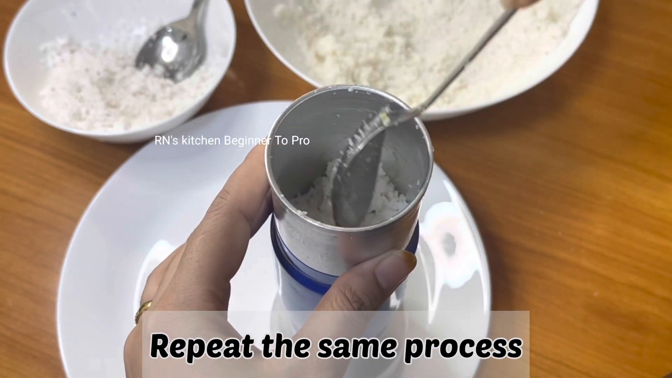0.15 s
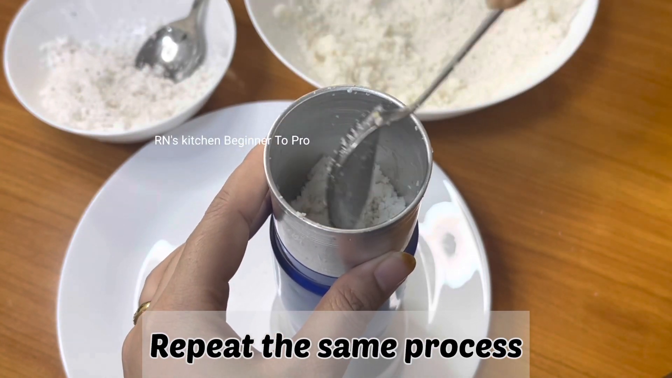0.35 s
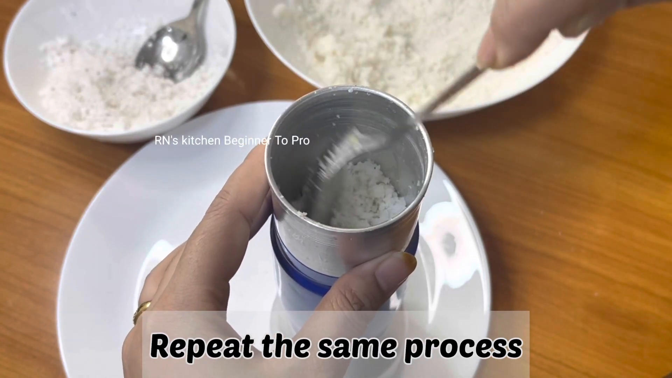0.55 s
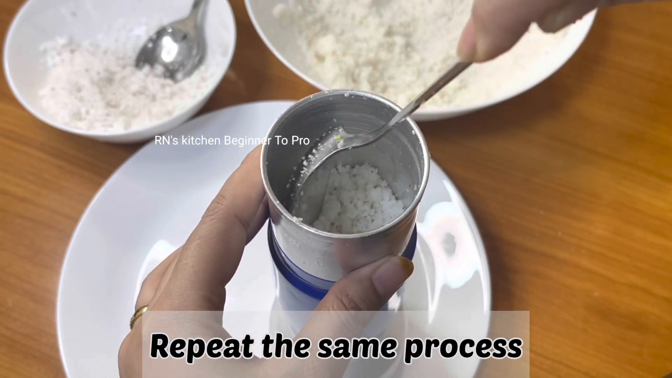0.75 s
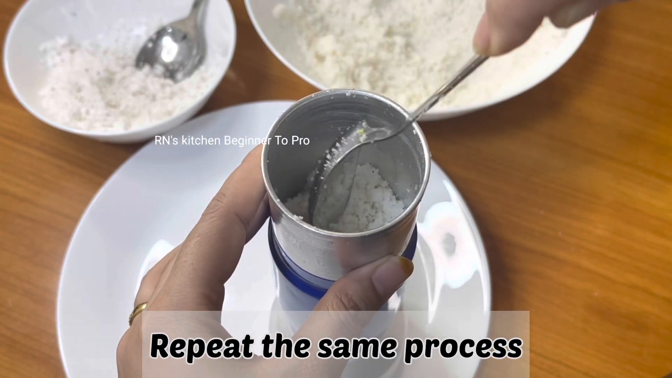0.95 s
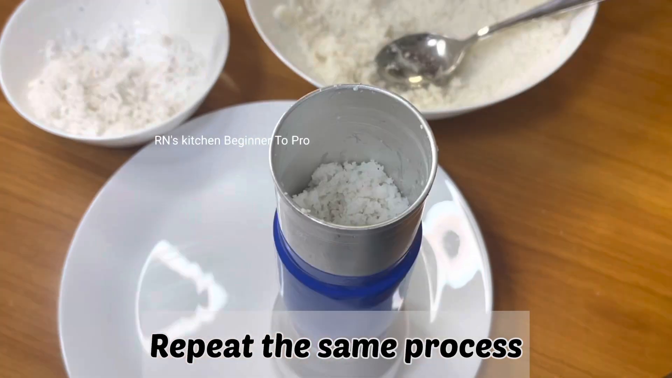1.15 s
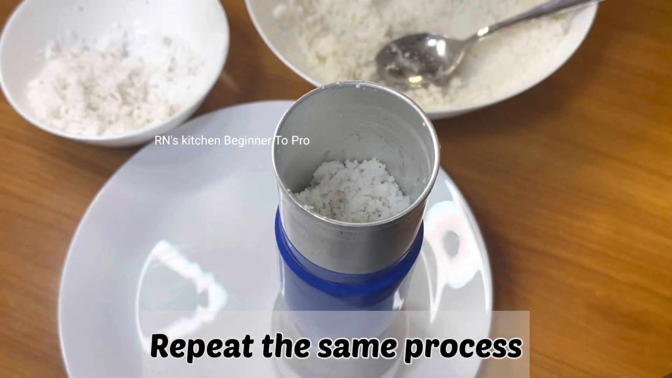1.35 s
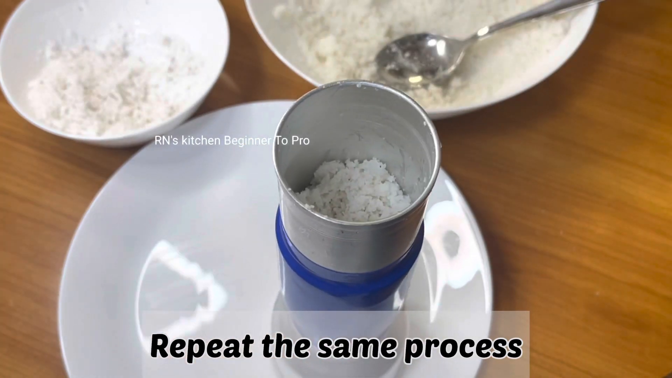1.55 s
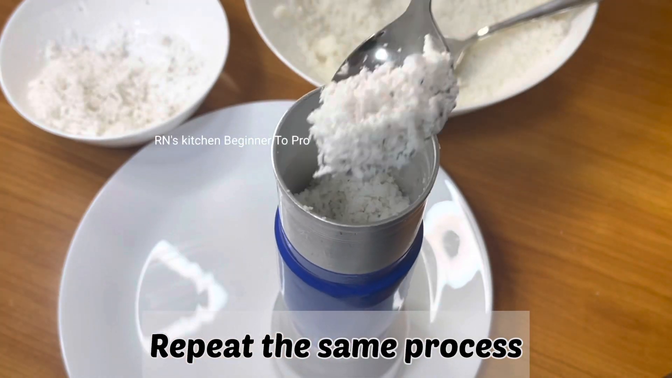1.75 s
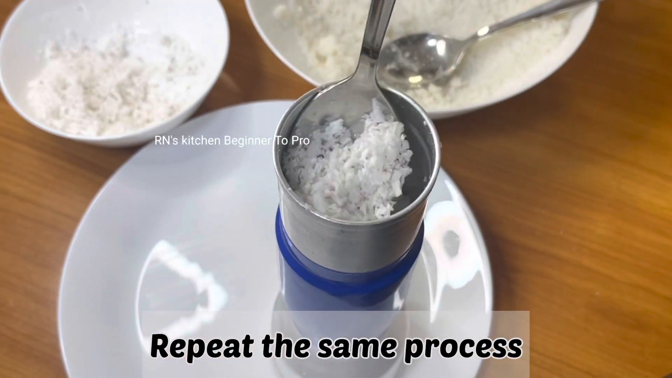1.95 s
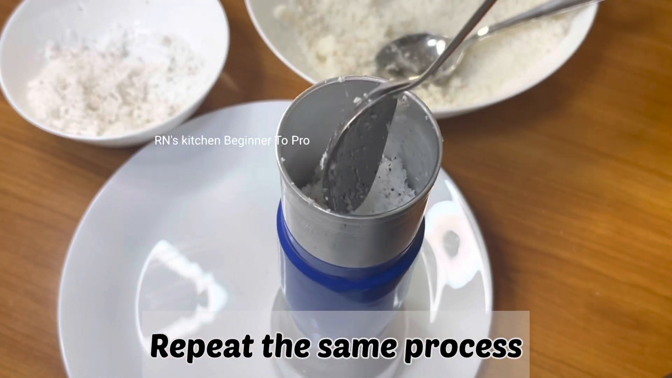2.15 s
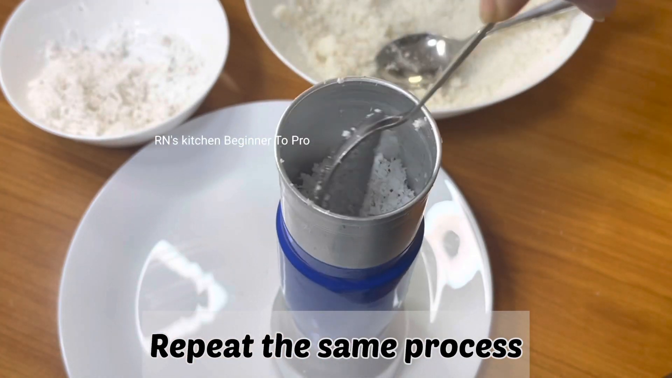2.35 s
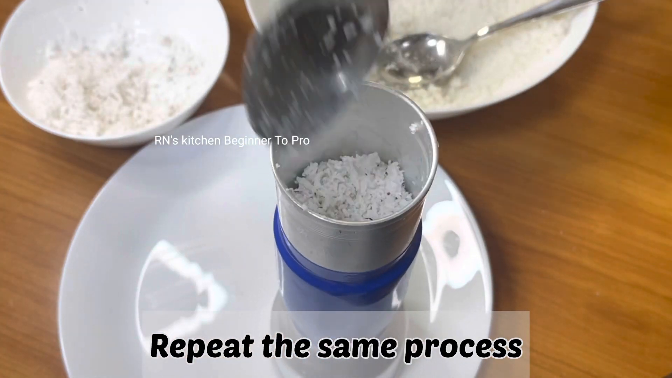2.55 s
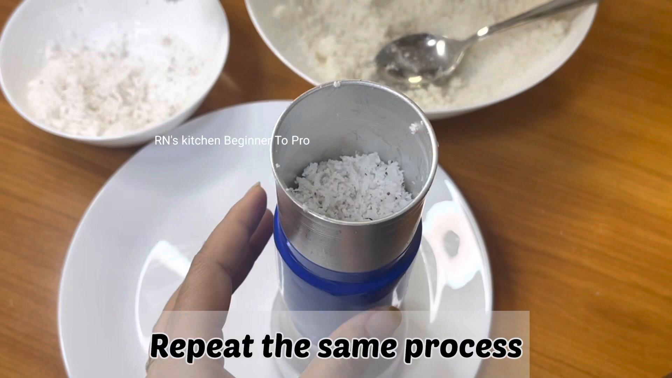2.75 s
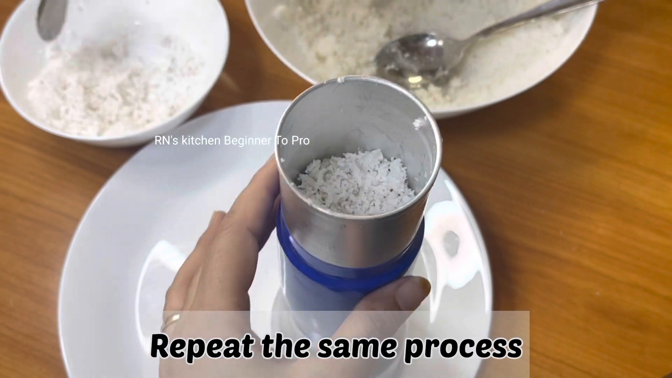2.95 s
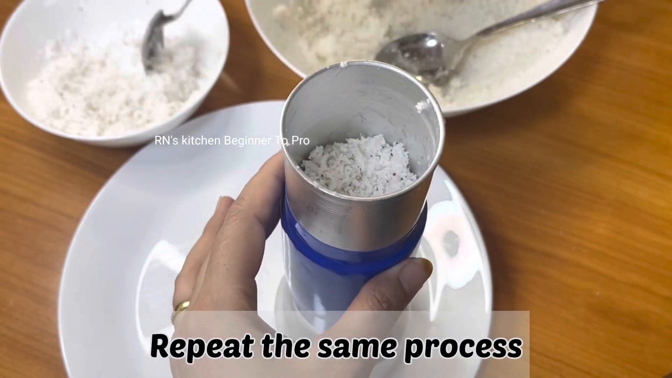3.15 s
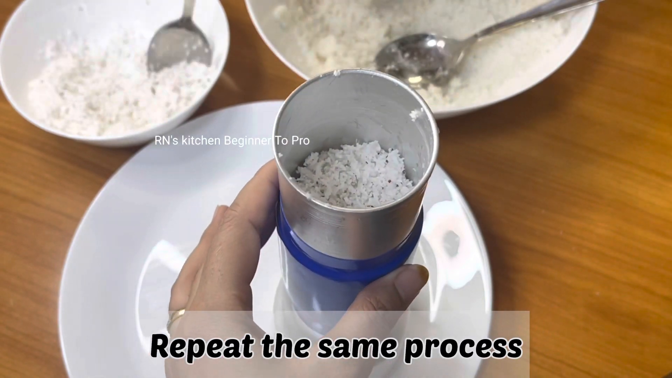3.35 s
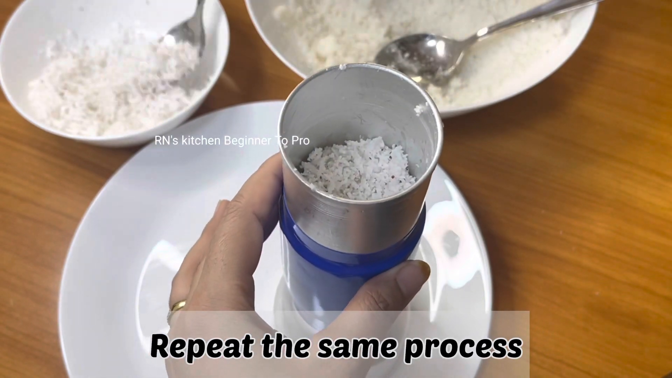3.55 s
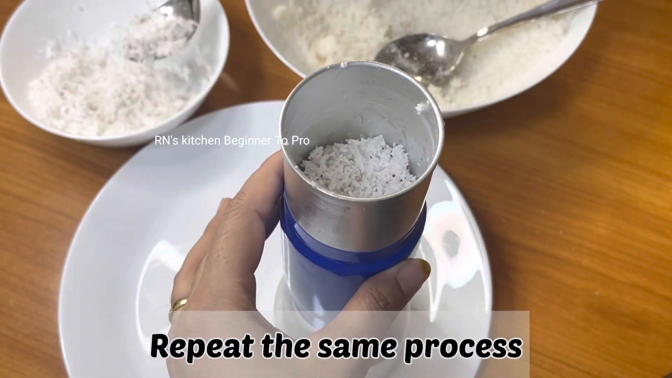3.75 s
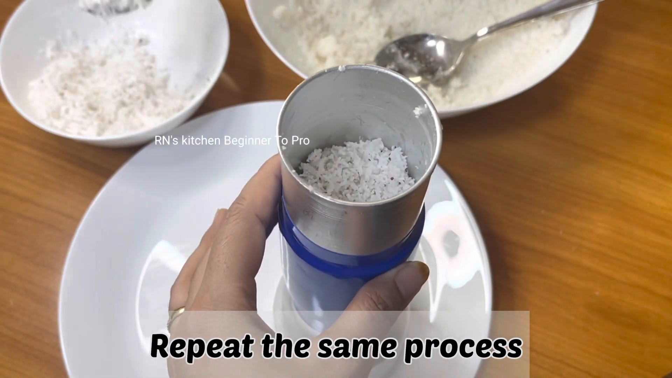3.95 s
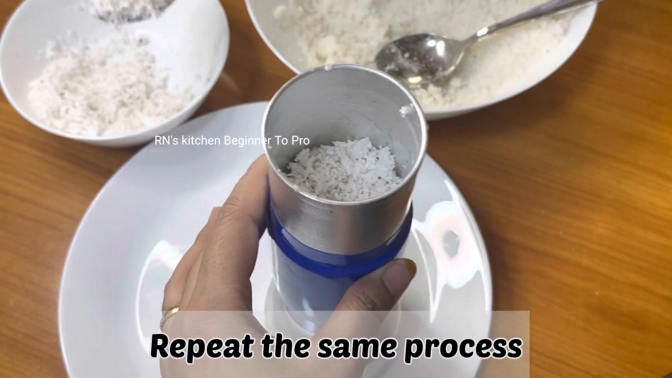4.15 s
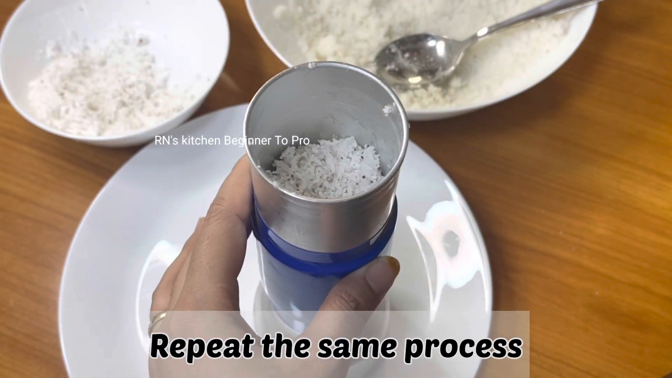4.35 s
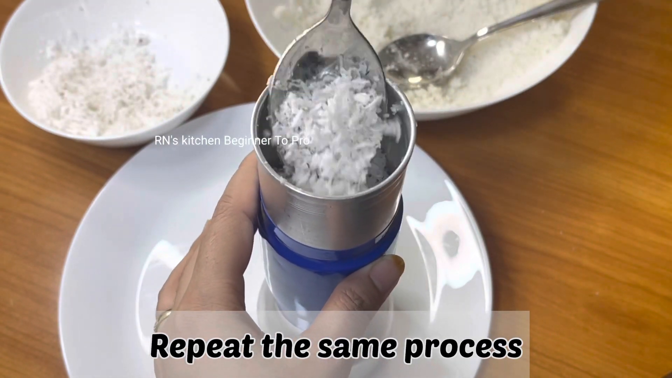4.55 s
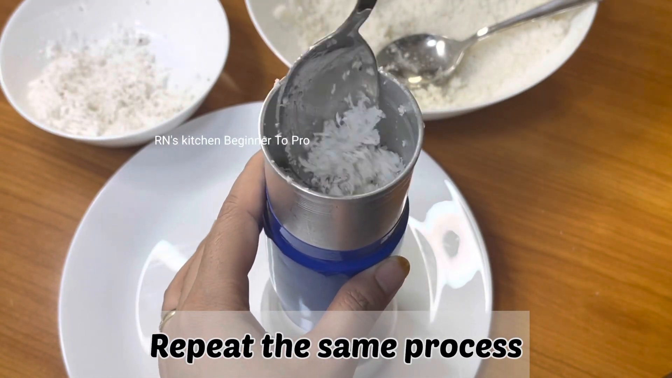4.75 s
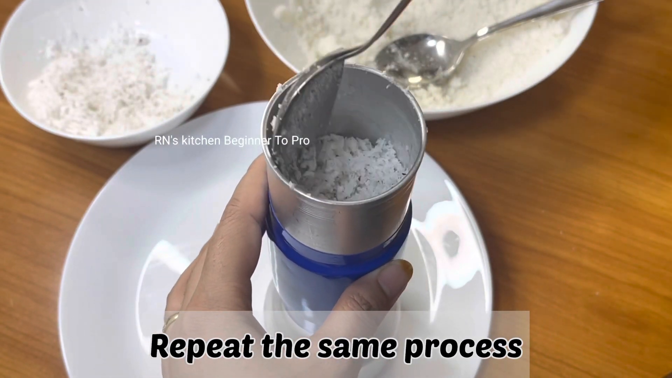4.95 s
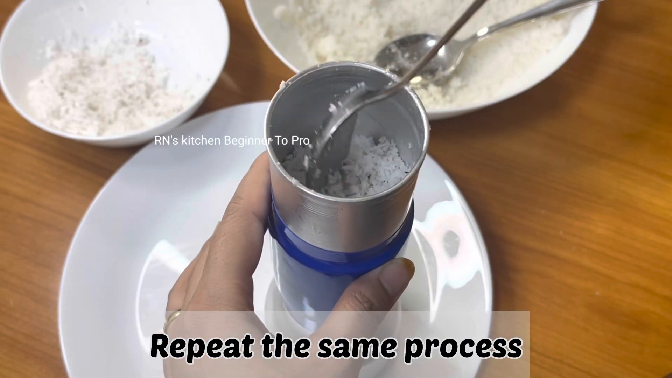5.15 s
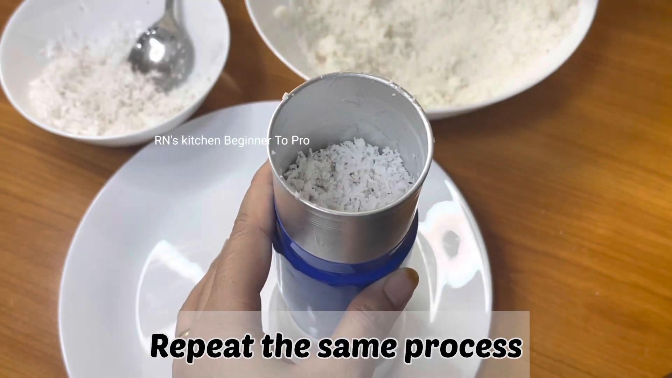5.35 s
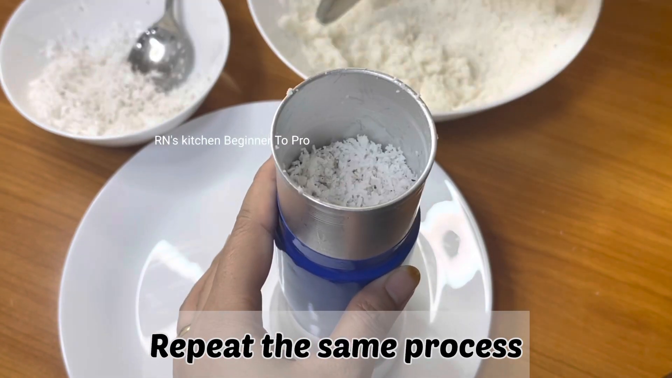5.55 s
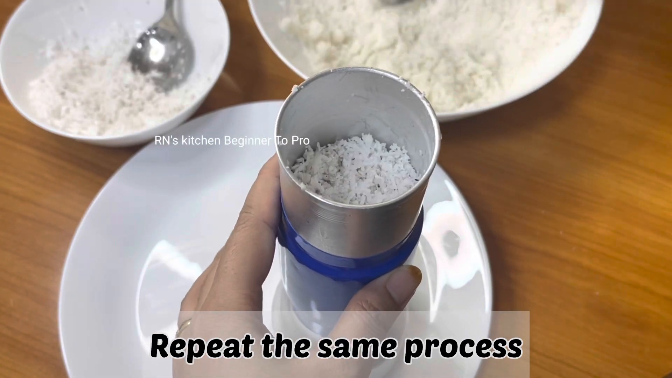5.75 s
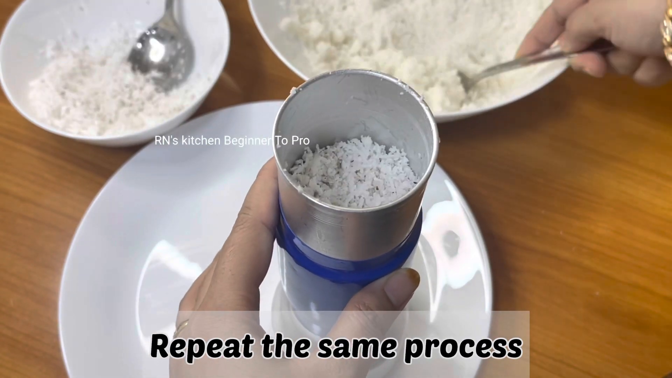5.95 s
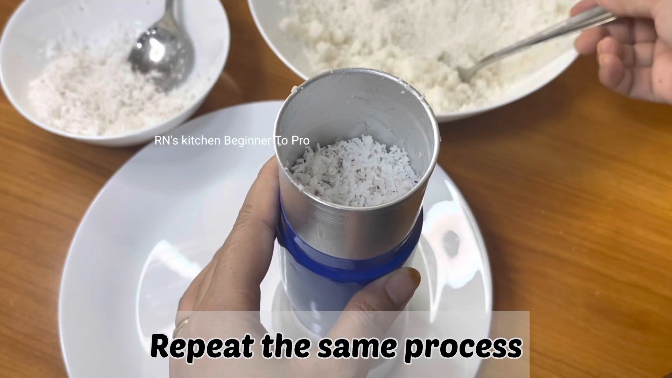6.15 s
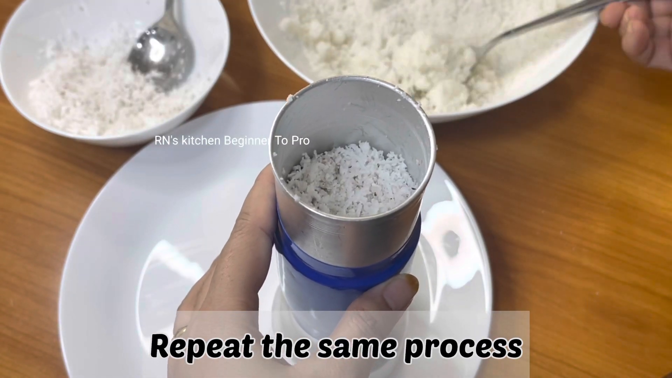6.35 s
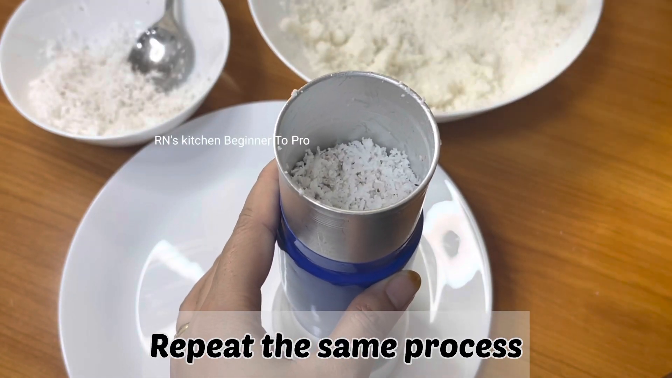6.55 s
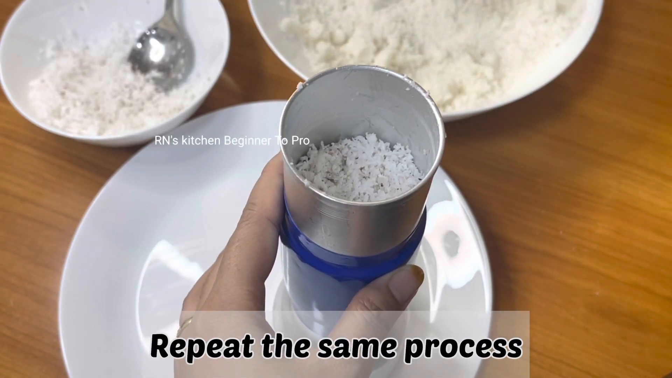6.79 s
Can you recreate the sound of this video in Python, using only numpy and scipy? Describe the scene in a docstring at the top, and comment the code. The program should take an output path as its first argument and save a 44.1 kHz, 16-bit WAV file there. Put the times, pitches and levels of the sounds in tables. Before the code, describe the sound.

Close, dry metallic clacks of a spoon packing grated food into a steel tube, broken by quiet gaps, one bright ceramic clink and low room hum.

```python
"""A small kitchen: a steel spoon fills a hand-held metal tube with grated food, over a low room hum. Taps,
clinks and knocks are noisy contacts that set off the ringing modes of tube, bowls or spoon. Scrapes along the
tube, rustles through the food and a faint singing are trains of small random slips. Table bumps are short low
sines. Hum and hiss are shaped noise. Diffuse echoes follow each hit and stroke. The whole level dips briefly
twice."""
import sys
import numpy as np
from scipy import signal
from scipy.fft import rfft, irfft
from scipy.io import wavfile
from scipy.ndimage import uniform_filter1d

SR = 44100
rng = np.random.default_rng(int(sys.argv[2]) if len(sys.argv) > 2 else 0)


def store_pcm(level_fs):
    """Save levels as 16-bit WAV."""
    pcm = np.round(np.clip(level_fs, -1, 1) * 32767).astype(np.int16)
    wavfile.write(sys.argv[1], SR, np.atleast_2d(pcm).T)


N = 300752


def gain_of(db):
    """dB to amplitude."""
    return 10 ** (np.asarray(db) / 20)


def evened(x):
    """Scales to rms 1."""
    return x / np.sqrt(np.mean(x ** 2) + 1e-20)


def read(points, hz):
    """Interpolates a spectrum on a log frequency axis."""
    f, value = np.transpose(points)
    return np.interp(np.log(hz + 1), np.log(f + 1), value)


def curve(points):
    """Interpolates (time, level) points over the whole scene."""
    return np.interp(np.arange(N) / SR, *np.transpose(points))


def coloured(x, *spectra):
    """Filters by the sum of the given dB spectra."""
    hz = np.fft.rfftfreq(len(x), 1 / SR)
    return irfft(rfft(x) * gain_of(sum(read(s, hz) for s in spectra)), len(x))


def add(mix, start_s, sound):
    """Mixes a sound in at its start time."""
    part = mix[..., max(round(start_s * SR), 0):][..., :sound.shape[-1]]
    part += sound[..., :part.shape[-1]]


def pair(shape, same):
    """Random short-time spectra for two channels that are partly alike."""
    a, b, c, d = rng.standard_normal((shape[1], shape[0], 4)).T
    lean = np.arccos(np.clip(same, 0, 1)[:, None]) / 2
    shared = np.cos(lean) * (a + 1j * b)
    apart = np.sin(lean) * (c + 1j * d)
    return np.array([shared + apart, shared - apart])


# steep treble limit of room tone, rings, strokes and echoes: (frequency [Hz], level [dB])
TREBLE_LIMIT = [(15800, 0), (16000, -42)]
# room rumble and hiss spectra: (frequency [Hz], level [dB per Hz])
RUMBLE_SPECTRUM = [(15, -72.5), (25, -50.5), (96, -5), (140, -5), (161, -18), (197, -3), (312, -11.5),
                   (374, -12), (456, -16.5), (525, -10.5), (629, -20.5), (1020, -24), (3000, -51.5),
                   (3900, -71), (6600, -120)]
HISS_SPECTRUM = [(1200, -30.5), (2000, -3), (3200, -5.5), (5500, -5.5), (7500, -11), (10200, -12.5),
                 (13600, -4.5), (15200, 2), (15800, 1.5)]
# their levels: (time [s], level [dB])
RUMBLE_LEVEL = [(0, -56.5), (.2, -67), (1., -63.5), (1.4, -67.5), (2.1, -62), (2.3, -66), (4., -67),
                (4.75, -60.5), (5., -66), (5.799, -62), (6.82, -68)]
HISS_LEVEL = [(0, -86), (1.202, -83), (2.601, -83), (4.4, -84.5), (5.4, -82.5), (6.82, -83.5)]
# wavering low tones: (frequency [Hz], width [Hz], level [dB rms])
LOW_TONES = [(97.6, 5.3, -81), (182, 57, -79.5)]
# unevenness of the room tone: (frequency [Hz], spread [dB])
HUM_UNEVENNESS = [(100, 2.5), (800, 2), (2000, 1.2), (16000, 1.2)]
# stereo likeness of the room tone: (frequency [Hz], left-right likeness [0-1])
HUM_LIKENESS = [(60, 1), (150, 0.88), (380, 0.9), (950, 0.71), (2380, 0.15), (5980, 1), (15000, 0.92)]


def hum():
    """Room tone: noise shaped into a rising and falling rumble, two wavering tones and a faint hiss."""
    hz = np.fft.rfftfreq(2048, 1 / SR)
    frames = N // 512 + 5
    patches = rng.standard_normal((frames, len(hz)))
    patches = uniform_filter1d(patches, size=5, axis=0)
    patches = evened(uniform_filter1d(patches, size=20, axis=1)).T
    noise = pair((len(hz), frames), read(HUM_LIKENESS, hz))
    noise = noise * gain_of(read(HUM_UNEVENNESS, hz)[:, None] * patches)

    def layer(shape, level_db):
        """Shapes the shared noise and sets its level."""
        sound = signal.istft(noise * shape[:, None], nperseg=2048, noverlap=1536)[1][:, :N]
        return gain_of(level_db) * evened(sound)

    limit_db = read(TREBLE_LIMIT, hz)
    out = layer(gain_of(read(RUMBLE_SPECTRUM, hz) + limit_db), curve(RUMBLE_LEVEL))
    out = out + layer(gain_of(read(HISS_SPECTRUM, hz) + limit_db), curve(HISS_LEVEL))
    for tone_hz, width_hz, level_db in LOW_TONES:
        out = out + layer(1 / (1 + (2 * (hz - tone_hz) / width_hz) ** 2), level_db)
    return out


def ringing(modes, spread_db, length, split):
    """Free ringing: the struck spot sets each mode's share; a grip splits modes into close clusters."""
    hz, db, t60_s = np.repeat(modes, 4, axis=0).T[:, :, None]
    t = np.arange(length) / SR
    level_luck, pitch_luck = rng.standard_normal((2, len(hz), 1))
    decay = gain_of(db + spread_db * level_luck - 60 * t / t60_s)
    ring = (decay * np.sin(2 * np.pi * hz * (1 + split * pitch_luck) * t)).sum(0)
    return ring / abs(ring).max()


def stroke(row, spectrum, modes, slips_per_s, spread_db):
    """Many small slips of uneven size; part of each goes into the modes of what is rubbed."""
    start_s, rise_s, fall_s, peak_db, bright_db, ring_db = row
    t = np.arange(0, rise_s + fall_s, 1 / SR)
    onset_db, fade_db = -14, -20  # start and end, re peak
    level_db = peak_db + np.interp(t, [0, rise_s, rise_s + fall_s], [onset_db, 0, fade_db])
    size_db = spread_db * np.minimum(rng.exponential(1, len(t)), 4)
    slips = gain_of(size_db) * rng.standard_normal(len(t))
    slips *= rng.random(len(t)) < slips_per_s / SR
    ring = signal.fftconvolve(slips, ringing(modes, 2.5, 2048, 0.0079))[:len(t)]
    sound = evened(coloured(slips, spectrum)) + gain_of(ring_db) * evened(ring)
    sound = coloured(sound, TREBLE_LIMIT)
    low = coloured(sound, [(7500, -0.5), (9500, -35.5)])
    mix = evened(low) + gain_of(bright_db) * evened(sound - low)
    return start_s, mix * gain_of(level_db) * signal.windows.tukey(len(t), .15)


# strokes along the tube wall:
# (start [s], rise [s], fall [s], peak level [dB], brightness [dB], ringing [dB])
SCRAPES = [(0.0, 0.0022, 0.07, -44.5, -3.5, -8), (0.12, .012, .035, -40, -5, 8),
           (0.159, 0.026, 0.029, -55.5, -9, -5), (0.33, .036, .04, -50, -4, 0),
           (0.82, 0.0062, 0.024, -52.5, -3, -4), (1.08, 0.0043, 0.024, -44.5, 5, 3),
           (1.958, 0.02, 0.076, -45.5, -8, 0), (2.542, .005, 0.062, -57.5, -6.5, -10),
           (2.59, 0.024, 0.057, -61.5, .5, -10)]
# rubbed tube wall: (frequency [Hz], level [dB per Hz])
RUB_SPECTRUM = [(300, -30), (600, -13.5), (1000, -12.5), (2500, -9.5), (3500, -14.5), (4600, -7),
                (5300, -17.5), (6050, -4.5), (7300, -23.5), (9100, -14.5), (10500, -21.5), (12800, -23.5),
                (13750, -11), (15500, -18)]
# tube modes: (frequency [Hz], level [dB], t60 [s])
TUBE_MODES = [(571, 0, .055), (700, -2, .05), (890, 0, .04), (1040, -2, .035), (1430, -3, .03),
              (2150, -2, .045), (2550, -2, .03), (2900, -6, .022), (3400, -7, .022), (4350, -1, .028),
              (4750, -2, .045), (5370, -6, .022), (5950, 2, .028), (6580, -6, .02), (8900, -8, .035),
              (9280, -7, .03), (11600, -9, .03), (13650, 2, .03), (14400, -3, .025), (15200, -4, .018)]


def scrapes(near):
    """The spoon slips along the tube wall and rings the tube."""
    for row in SCRAPES:
        add(near[:2], *stroke(row, RUB_SPECTRUM, TUBE_MODES, slips_per_s=4600.0, spread_db=1.0))


# noisy contact of a blow: (frequency [Hz], level [dB per Hz])
CRACK_SPECTRUM = [(200, -28), (500, -14), (900, -4.5), (2500, 0), (4500, -1), (5300, -8), (6000, 0),
                  (7300, -12.5), (9100, -6.5), (11000, -12), (12500, -11), (13700, 0), (15300, -3),
                  (16800, -21.5)]


def blow(row, modes, spread_db, split, thud_db, middle_db, middle_slope):
    """Rattling contact: noisy crack, slower thud and the modes set off; rows left, right, sideways."""
    start_s, peak_db, sparkle_db, ring_db = row
    # brighter blow: shorter contact, less thud, more middle; slopes in dB per dB
    thud_db = thud_db - .45 * sparkle_db
    middle_db = middle_db + middle_slope * sparkle_db
    contact_ms = max(.75 * gain_of(-0.32 * sparkle_db), .2)
    colour = [(45, thud_db - 50), (100, thud_db - 24.0), (330, thud_db), (550, thud_db + 9.5),
              (900, thud_db + 14.0), (2000, 0), (3500, .25 * min(middle_db, 0)), (6000, middle_db),
              (10000, (middle_db + sparkle_db) / 2), (13500, sparkle_db)]
    lead_s = .004
    t = np.arange(8192) / SR - lead_s
    after = np.maximum(t, 0)

    u = after / (contact_ms / 1000)
    crack = coloured(u * np.exp(1 - u) * rng.standard_normal(len(t)), CRACK_SPECTRUM)
    slow = after / 0.0049
    thud = coloured(slow * np.exp(1 - slow) * rng.standard_normal(len(t)),
                    [(200, 0.5), (450, -7), (1200, -17.5), (2500, -38.5)])

    ring = ringing(modes, spread_db, len(t), split) * np.minimum(np.arange(len(t)) / 60, 1)
    ring = coloured(np.roll(ring, round(lead_s * SR)), TREBLE_LIMIT)
    # modes too dense to tell apart
    clatter = evened(coloured(rng.standard_normal(len(t)), CRACK_SPECTRUM, TREBLE_LIMIT))
    clatter = clatter * gain_of(-60 * after / 0.026)
    ring = ring + gain_of(-9.5) * clatter * np.clip(t / 0.006, 0, 1)

    parts = crack / abs(crack).max() + gain_of(-7) * thud / abs(thud).max()
    parts = parts + gain_of(ring_db) * ring * (t > 0)
    sound = gain_of(peak_db) * coloured(parts, colour) * np.clip(t / 0.0014 + 1, 0, 1)
    # quick reflections off table and crockery reach the two ports with opposite sign
    bounce = rng.standard_normal(512) * np.exp(-np.arange(512) / 90)
    side = signal.fftconvolve(sound, bounce / np.linalg.norm(bounce))[:len(t)]
    pan_db = .6  # left minus right
    return start_s - lead_s, np.array([sound * gain_of(pan_db / 2), sound * gain_of(-pan_db / 2), side])


# spoon on the tube: (time [s], level [dB], brightness [dB], ringing [dB])
TAPS = [(0.0248, -37, -17, 4), (0.0662, -18, -1.5, 1.5), (0.1181, -33, 5.5, 11), (0.1752, -42, 4, -17),
        (0.1821, -44, -2, -7.5), (0.3235, -32, -6.5, -19), (0.4247, -20, 1.5, 8), (0.4398, -26, -25, -7),
        (0.5392, -26.5, 10, 5.5), (0.5462, -17.5, -6.5, 1), (0.6214, -27, -8, 0.5),
        (0.7328, -37.5, -11.5, 6), (0.8155, -40.5, 2, 6.5), (0.8374, -21.5, -8.5, -8),
        (0.9389, -36, -4, -0.5), (0.9637, -34.5, -2.5, 7), (1.0001, -34.5, -15, -17),
        (1.0283, -28.5, -2.5, -16), (1.0778, -24, 7, 9.5), (1.1044, -18.5, -3.5, -1.5),
        (1.142, -36.5, 0, -20.5), (1.8908, -31.5, 2.5, -8.5), (1.9233, -34.5, -4, 6),
        (2.0511, -23.5, 0, 4.5), (2.1387, -26.5, -4, -7), (2.535, -29, -1, 1), (4.5249, -15.5, 2.5, -2.5),
        (4.5509, -20, -4, 3.5), (4.629, -37, -8, -7), (4.6388, -25, 1.5, 4), (4.6805, -29, 1.5, -2),
        (4.7186, -18, 1, -1), (4.8477, -33, -5, -1), (4.8535, -27.5, 3, 5), (4.8617, -15, 1, 4),
        (4.9447, -20.5, 2.5, -4.5), (5.0886, -16, 5, 2.5), (5.2235, -29.5, -9, -9)]


def taps(near):
    """The spoon strikes the hand-held tube, whose gripped modes split widely."""
    for row in TAPS:
        add(near, *blow(row, TUBE_MODES, spread_db=3., split=.014,
                        thud_db=-15.5, middle_db=1.5, middle_slope=.55))


# hand and crockery on the table: (time [s], level [dB], pitch [Hz], t60 [s])
BUMPS = [(1.507, -51.5, 135.6, 0.051), (3.051, -43.5, 124, 0.036), (3.295, -39, 202, 0.12),
         (3.874, -47.5, 128, 0.033), (3.936, -43.5, 220, 0.037), (5.964, -26.5, 237.6, 0.02),
         (6.456, -52, 259, 0.062)]


def bumps(near):
    """Dull table bumps: a few low, decaying cycles with a soft start."""
    t = np.arange(round(.15 * SR)) / SR
    for start_s, level_db, hz, t60_s in BUMPS:
        decay = gain_of(level_db - 60 * t / max(t60_s, .01))
        add(near[:2], start_s, decay * np.sin(2 * np.pi * hz * t) * np.minimum(t / 0.0035, 1))


# strokes through the food:
# (start [s], rise [s], fall [s], peak level [dB], brightness [dB], ringing [dB])
RUSTLES = [(2.97, 0.027, 0.056, -63, -26, -22), (3.005, .02, 0.046, -63.5, -22, -22),
           (3.145, 0.015, .045, -64, -20, -15), (3.415, .012, 0.037, -63, -1, -25),
           (3.445, .015, .045, -70, -6, -25), (3.865, .012, 0.021, -70.5, -22, -22),
           (4.13, .045, .03, -64, -5, -24), (4.16, .03, .06, -58.5, -22, -24), (5.4, .015, .06, -73, 1, -9),
           (5.42, .035, .08, -68, -12, -20), (5.801, 0.011, 0.083, -76.5, -11.5, -14)]
# rubbed food: (frequency [Hz], level [dB per Hz])
FOOD_SPECTRUM = [(300, -16.5), (500, 2.5), (900, -3.5), (1400, -10.5), (2400, -9), (3100, -19.5),
                 (4400, -17.5), (5400, -24), (6050, -8.5), (6700, -18), (7300, -31.5), (9500, -29),
                 (12000, -38), (15000, -34)]
# spoon modes: (frequency [Hz], level [dB], t60 [s])
SPOON_MODES = [(3900, -4, .06), (5534, 0, .1), (9378, -6, .14), (11520, -8, .11), (13390, -12, .12),
               (14020, -6, .09), (15250, -12, .12)]


def rustles(near):
    """The spoon slips through the food, with a little of its own ring."""
    for row in RUSTLES:
        add(near[:2], *stroke(row, FOOD_SPECTRUM, SPOON_MODES, slips_per_s=3000.0, spread_db=3.))


# spoon on a bowl: (time [s], level [dB], brightness [dB], ringing [dB])
CLINKS = [(3.2792, -13.5, 4, 1.5), (3.2846, -22, 7, -6), (3.2955, -10.5, 2.5, -5)]
# bowl mode pitches: frequency [Hz]
BOWL_HZ = [571, 700, 890, 1595, 2196, 3020, 3408, 3571, 4770, 5329, 6108, 7741, 9203, 12880, 14390, 14660,
           15220]
# bowl mode strengths: (level [dB], t60 [s])
BOWL_RING = [(-16.5, 0.13), (3, 0.09), (1.5, 0.08), (-2.5, 0.09), (-16, 0.047), (-15.5, 0.095), (-15, .12),
             (0.3, 0.08), (-18.5, .08), (-19, .07), (-4.5, 0.24), (-24, .08), (-9, 0.22), (-2.5, 0.09),
             (-9, 0.074), (-7, .06), (-8, .05)]
# resting spoon stops the bowl's ring: (time [s], level [dB])
BOWL_DAMPING = [(3.405, -1.5), (3.43, -23)]


def clinks(near):
    """The spoon rings a ceramic bowl, then rests on it and damps it."""
    bowl_modes = np.column_stack([BOWL_HZ, BOWL_RING])
    free = np.zeros_like(near)
    for row in CLINKS:
        add(free, *blow(row, bowl_modes, spread_db=1.1, split=.0012,
                        thud_db=-10.5, middle_db=-4.5, middle_slope=.3))
    near += free * gain_of(curve(BOWL_DAMPING))


# spoon on bowls: two dull touches on the bowl, then a louder knock as it is set down in a larger bowl: (time
# [s], level [dB], brightness [dB], ringing [dB])
KNOCKS = [(3.4093, -42, -21, -6.5), (3.463, -54, -28, -2), (5.882, -20, -2.5, -1)]
# modes of the bowl contacts: (frequency [Hz], level [dB], t60 [s])
KNOCK_MODES = [(700, -3, 0.05), (1430, -5.5, 0.077), (2140, -6, 0.037), (2657, -2.5, 0.077), (6160, 3, 0.07),
               (8670, -34, .05), (13690, -21, 0.044), (14390, 5, .1), (15800, 1, .07)]


def knocks(near):
    """The spoon touches the bowl dully twice, then is set down in a larger bowl, setting off their modes."""
    for row in KNOCKS:
        add(near, *blow(row, KNOCK_MODES, spread_db=2.1, split=.012,
                        thud_db=-9.5, middle_db=4, middle_slope=1.15))


# spoon drawn away:
# (start [s], rise [s], fall [s], peak level [dB], brightness [dB], ringing [dB])
SINGING = [(3.47, .07, .14, -81.5, -30, 3)]


def singing(near):
    """One spoon mode sings faintly, fed by small slips."""
    for row in SINGING:
        add(near[:2], *stroke(row, FOOD_SPECTRUM, SPOON_MODES[1:2], slips_per_s=1500.0, spread_db=2.0))


# spoon alone: (time [s], level [dB], brightness [dB], ringing [dB])
PINGS = [(4.188, -59, -21.5, 3.2), (4.2253, -55.5, -26, 3.5), (6.2991, -65, 8, 4.2)]


def pings(near):
    """Faint blows ring the spoon's own modes."""
    for row in PINGS:
        add(near, *blow(row, SPOON_MODES, spread_db=2.1, split=.003,
                        thud_db=-27, middle_db=-10, middle_slope=.6))


# echo decay: (frequency [Hz], t60 [s])
KITCHEN_T60 = [(250, 0.49), (700, 0.2), (2000, .22), (5000, 0.16), (9000, 0.2), (15000, 0.16)]
# stereo likeness of the echoes: (frequency [Hz], left-right likeness [0-1])
KITCHEN_LIKENESS = [(250, .97), (600, .93), (1200, .6), (2400, .55), (6000, .85), (15000, .92)]


def kitchen(x):
    """Diffuse echoes, each band dying at its own speed; three tails take turns so like hits differ."""
    hz, t = np.fft.rfftfreq(128, 1 / SR), np.arange(700) * 32 / SR
    phase = 2 * np.pi * 2.3 * np.arange(N) / SR
    out = np.zeros((2, N))
    for k in range(3):
        noise = pair((len(hz), len(t)), read(KITCHEN_LIKENESS, hz))
        noise = noise * gain_of(-60 * t / read(KITCHEN_T60, hz)[:, None])
        tail = signal.istft(noise * np.clip(t / 0.0063, 0, 1), nperseg=128, noverlap=96)[1]
        tail = tail / np.linalg.norm(tail[0])
        share = np.sqrt(2 / 3) * np.cos(phase + k * np.pi / 3)
        out += signal.fftconvolve((x * share)[None], tail, axes=1)[:, :N]
    return np.array([coloured(channel, TREBLE_LIMIT) for channel in out])


# port imbalance: (frequency [Hz], left minus right [dB])
PORT_BALANCE = [(250, -.3), (500, -1.5), (1000, -3), (2000, 1.5), (4000, 0), (15000, 0)]
# port phase: (frequency [Hz], left lead [rad])
PORT_LEAD = [(800, 0), (1460, .7), (2200, .3), (3200, -.3), (6000, .3), (16000, .1)]
# sideways reflections: (frequency [Hz], level [dB])
SIDE_SPECTRUM = [(250, -28), (700, -24), (1200, -6), (2200, -8), (4000, -15), (8000, -9), (14000, -16)]


def at_ports(near):
    """Two microphone ports hear the direct sound unequally, and reflections with opposite sign."""
    hz = np.fft.rfftfreq(N, 1 / SR)
    port = gain_of(read(PORT_BALANCE, hz) / 2) * np.exp(.5j * read(PORT_LEAD, hz))
    direct = irfft(rfft(near[:2]) * np.array([port, 1 / port]), N)
    side = coloured(near[2], SIDE_SPECTRUM)
    return direct + np.array([side, -side])


def scene():
    """Blows, strokes and bumps, their echoes, and the room tone."""
    near = np.zeros((3, N))  # left, right, sideways
    for source in (clinks, taps, knocks, pings, scrapes, rustles, singing, bumps):
        source(near)
    echoes = kitchen(near[:2].mean(0))
    return at_ports(near) + gain_of(-10.0) * echoes + hum()


# brief level dips: (time [s], fade out [s], fade in [s], depth [dB])
DIPS = [(1.192, 0.021, .04, -26), (5.389, .004, .013, -22)]


def record(dry):
    """Dips the level, then drops deep bass as the microphone does, then limits the band."""
    now = np.arange(N) / SR
    dip_db = np.zeros(N)
    for time_s, out_s, in_s, depth_db in DIPS:
        dip_db += np.interp(now, [time_s - out_s, time_s, time_s + in_s], [0, depth_db, 0])
    bass_cut = signal.butter(4, 48, "highpass", fs=SR, output="sos")
    sound = signal.sosfilt(bass_cut, dry * gain_of(dip_db))
    edge_hz = 16750
    band = signal.firwin(255, edge_hz, window=("kaiser", 9), fs=SR)
    return signal.oaconvolve(sound, band[None], "same")


dry = scene()
out = record(dry)
store_pcm(out)
```